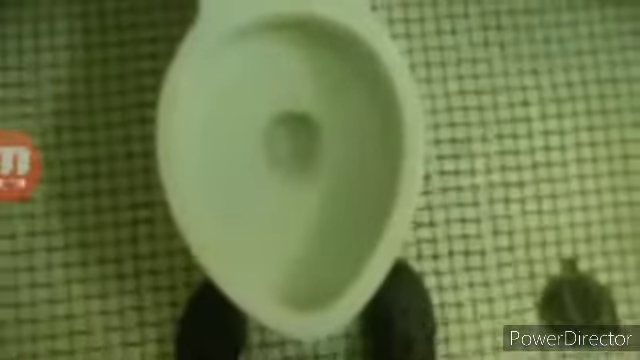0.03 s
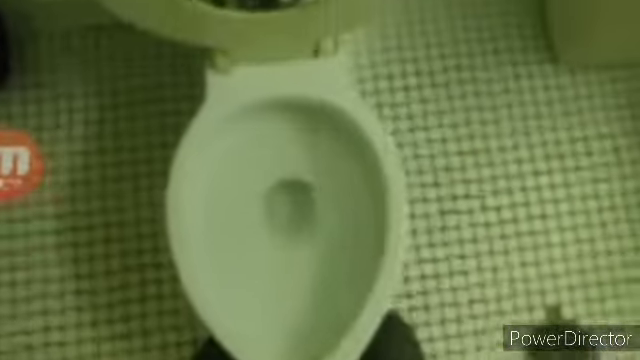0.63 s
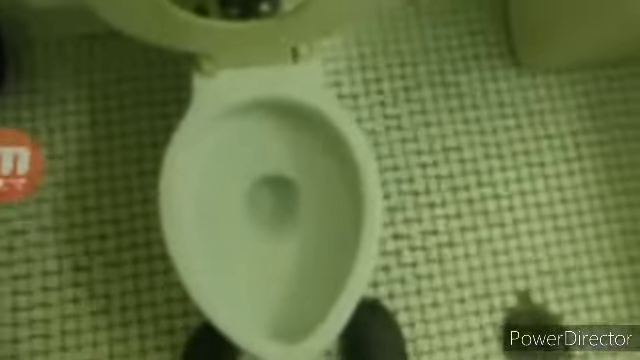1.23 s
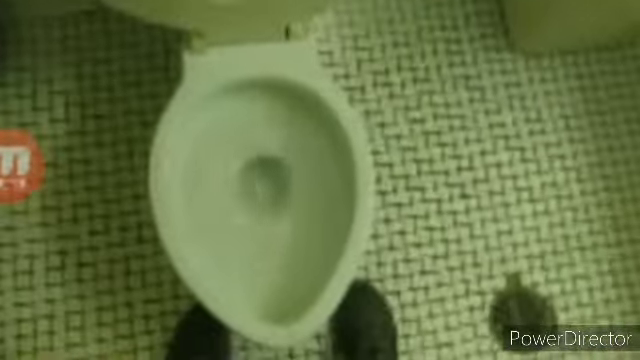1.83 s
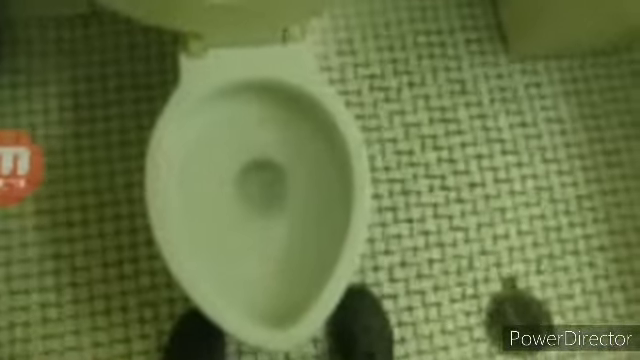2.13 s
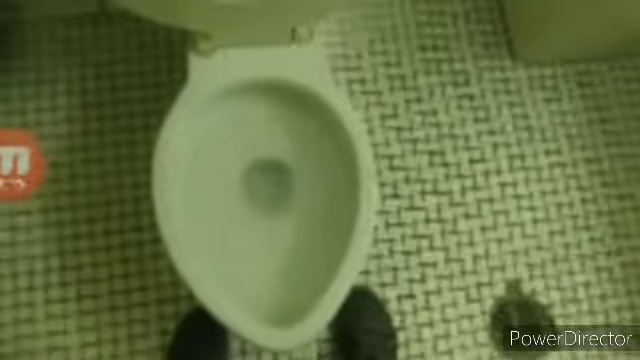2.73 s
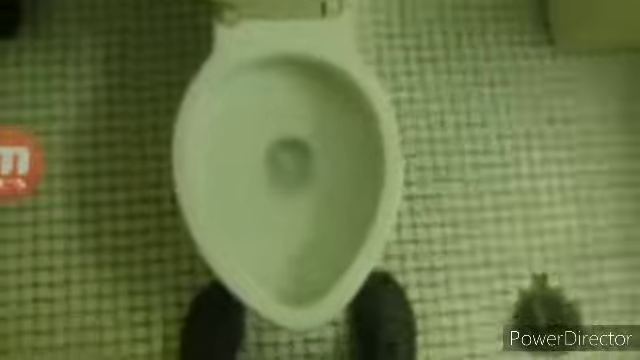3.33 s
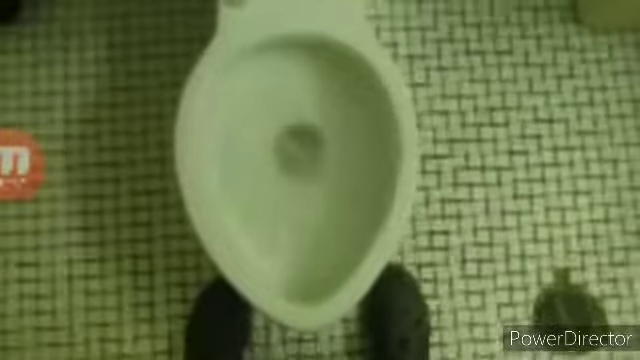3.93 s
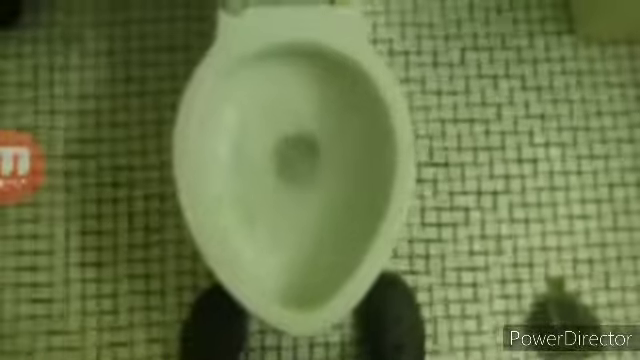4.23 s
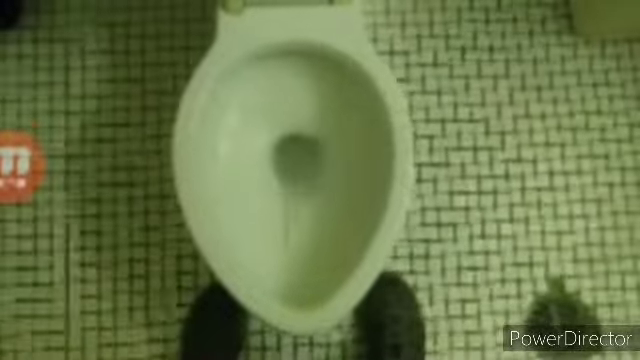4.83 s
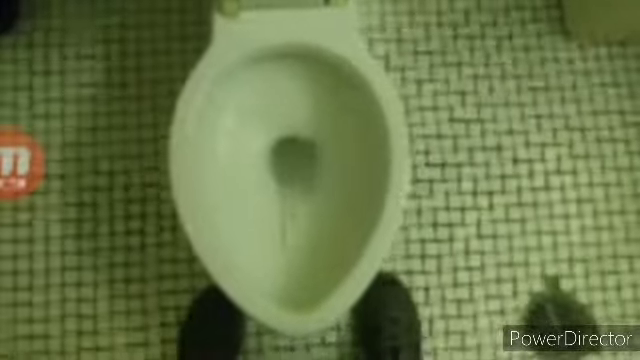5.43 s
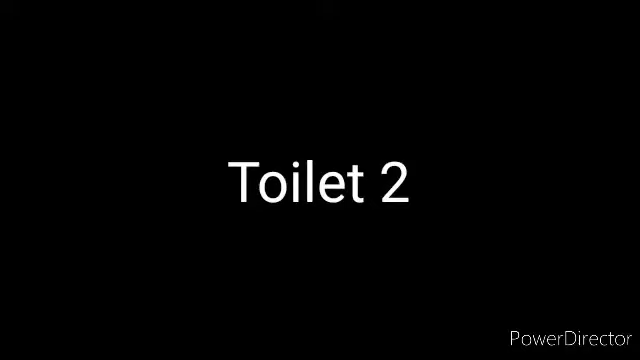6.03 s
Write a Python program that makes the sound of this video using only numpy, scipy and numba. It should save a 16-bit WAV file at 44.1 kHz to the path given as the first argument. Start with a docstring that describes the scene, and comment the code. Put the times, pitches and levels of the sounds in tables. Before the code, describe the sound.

A pressure-valve toilet flushes in a small tiled restroom, heard from just above the bowl with a short, bright echo. A sharp metal clack comes at 0.1 seconds and another at 0.65, with lighter knocks over a quiet pipe hiss and a faint low fan hum. Water starts near 0.9 seconds, and trapped air belches through the trap around 1.2 to 1.4. From 1.6 seconds a loud, steady, fizzing rush churns the bowl, with soft drumming in the drain. From about 3 seconds the flow sputters in bright spurts, smacks and pinging drops as the bowl empties. Near 5 seconds water slaps back onto the porcelain, sounding hollower, with glugs, spray and small puffs of air buffeting the microphone. The sound stops abruptly at 5.9 seconds.

```python
"""A pressure-valve toilet flushes in a small tiled restroom, heard from just above the bowl.
The supply pipe hisses over a faint low fan hum, and the valve clacks. The jet opens, trapped air
belches through the trap, then the jet tears the water into fizzing bubbles while slugs drum in the drain.
From about 3 s it sputters as the bowl empties. Near 5 s water slaps back in, with glugs and puffs of air.
The sound stops abruptly at 5.9 s; a limiter holds the loudest peaks throughout."""
import sys
import numpy as np
from scipy import signal
from scipy.fft import rfft, irfft
from scipy.io import wavfile
from scipy.ndimage import uniform_filter1d, minimum_filter1d
from numba import njit

SR = 44100
rng = np.random.default_rng(int(sys.argv[2]) if len(sys.argv) > 2 else 0)


def store_wav(level_fs):
    """Save 16-bit WAV to argv[1]."""
    pcm = np.round(np.clip(np.atleast_2d(level_fs), -1, 1) * 32767)
    wavfile.write(sys.argv[1], SR, pcm.T.astype(np.int16))


N = 269010
TIME = np.arange(N) / SR
FREQ = np.maximum(np.fft.rfftfreq(2048, 1 / SR), 1)


def undb(db):
    """Decibels to gain."""
    return 10 ** (np.asarray(db) / 20)


def curve(table, column=1):
    """One table column at every sample."""
    rows = np.array(table)
    return np.interp(TIME, rows[:, 0], rows[:, column])


def during(table, fade_s=0.023):
    """Gate, open over a table's time span."""
    return np.clip(np.minimum(TIME - table[0][0], table[-1][0] - TIME) / fade_s + 1, 0, 1)


def shape(x, db):
    """Minimum-phase filter, one gain per FREQ bin."""
    cepstrum = irfft(np.log(undb(db)))
    half = len(cepstrum) // 2
    cepstrum[1:half] *= 2
    cepstrum[half + 1:] = 0
    return signal.fftconvolve(x, irfft(np.exp(rfft(cepstrum))))[:len(x)]


def colour(x, points, tilt_db_oct=0):
    """Filter by (frequency [Hz], gain [dB]) points plus a tilt."""
    hz, db = np.transpose(points)
    tilt_db = tilt_db_oct * np.log2(np.maximum(FREQ / hz[0], 1))
    return shape(x, np.interp(np.log(FREQ), np.log(hz), db) + tilt_db)


def steady(x, samples=4000):
    """Hold the running rms at 1, keeping the fast grain."""
    return x / np.sqrt(np.abs(uniform_filter1d(x * x, samples)) + 1e-12)


def noise(length, points, tilt_db_oct=0, samples=4000):
    """Coloured noise at unit rms."""
    return steady(colour(rng.standard_normal(length), points, tilt_db_oct), samples)


def add(out, time_s, sound):
    """Mix a sound in at time_s."""
    start = max(int(time_s * SR), 0)
    out[start:start + len(sound)] += sound[:len(out) - start]


def swell(start_s, hold_s, attack_s, release_s):
    """Envelope of a push of water or air: rise, hold, decay."""
    age_s = TIME - start_s
    return np.clip(age_s / attack_s, 0, 1) * np.exp(-np.maximum(age_s - hold_s, 0) / release_s)


@njit
def ring(length, start, hz, cycles, gain, glide):
    """Bubbles as sines: quick swell, 60 dB decay over their cycles, pitch up by the fraction glide."""
    out = np.zeros(length)
    for k in range(len(start)):
        life = cycles[k] * SR / hz[k]
        turn_rad = 2 * np.pi * min(hz[k], 0.4 * SR) / SR
        phasor = gain[k] + 0j
        step = np.exp(1j * turn_rad - 6.9 / life)
        bend = np.exp(1j * turn_rad * glide / life)
        closed, opening = 1., np.exp(-40 / life)
        for i in range(int(start[k]), min(int(start[k] + life), length)):
            out[i] += phasor.imag * (1 - closed)
            phasor *= step
            step *= bend
            closed *= opening
    return out


def bubbles(hz, spread_oct, cycles, skew, count):
    """Random bubble cloud around a pitch; skew makes a few much stronger."""
    when, strength = rng.random((count, 2)).T
    detune, life = rng.standard_normal((count, 2)).T
    start = np.floor(when * N)
    pitch_hz = (hz * np.ones(N))[start.astype(int)] * 2 ** (spread_oct * detune)
    gain = (0.01 + strength) ** -skew
    return ring(N, start, pitch_hz, cycles * np.exp(life / 2), gain, glide=0.029)


def trap_mouth(x, cutoff_hz=580):
    """The narrow trap radiates almost nothing below its lowest resonance."""
    return signal.sosfilt(signal.butter(7, cutoff_hz, "high", fs=SR, output="sos"), x)


# Bowl resonances and notches: (frequency [Hz], width [Hz], relative gain [dB])
BOWL_BANDS = [(780, 90, 1), (900, 330, 1.5), (1291, 140, 4), (1418, 54, 5.5), (1901, 200, 4),
              (2540, 150, 1.5), (2756, 140, 6), (3013, 170, -1.5), (3247, 100, 4), (3755, 112, -11.5),
              (3824, 93, 6.5), (4238, 163, -10.5), (4570, 310, -2.5), (4773, 98, -13), (5470, 90, 4),
              (5493, 67, -12), (5720, 270, 4), (6476, 77, 5.5), (6680, 390, -1.5)]


def restroom(x, t60_s=0.18, tail_db=-6):
    """The bowl colours the sound; close tiled walls add a short bright tail."""
    bowl_db = sum(db * np.exp(-2 * ((FREQ - hz) / width_hz) ** 2) for hz, width_hz, db in BOWL_BANDS)
    direct = shape(x, bowl_db - 3)
    t = TIME[:SR // 2]
    tail = rng.standard_normal(len(t)) * np.exp(-np.log(1000) * t / t60_s) * (t > 0.003)
    tail = colour(tail / np.linalg.norm(tail), [(200, -0.5), (1200, 0), (6000, -3), (13000, -10)])
    return direct + undb(tail_db) * signal.fftconvolve(direct, tail)[:N]


# Pipe hiss with fan peaks at 95 and 210 Hz: (frequency [Hz], gain [dB])
PIPE_AND_FAN_SPECTRUM = [(30, -49), (60, -22.5), (95, -7), (150, -21), (210, -8), (300, -15.5), (550, -14),
                         (800, -5), (1300, 0.5), (2000, -3), (3300, -8), (5900, 9.5), (10000, -5.5),
                         (15000, -11)]
# Hiss and hum envelope: (time [s], level [dB])
PIPE_AND_FAN_LEVEL = [(0, -38.5), (.03, -46), (.08, -43.5), (.24, -53.5), (.34, -48), (.45, -48.5),
                      (.55, -50), (.64, -47.5), (.7, -42.5), (.84, -40.5), (1.2, -42.5)]


def pipe_and_fan():
    """Supply-pipe hiss over a faint low fan hum."""
    return noise(N, PIPE_AND_FAN_SPECTRUM) * undb(curve(PIPE_AND_FAN_LEVEL))


# Drain spectrum before tilt: (frequency [Hz], gain [dB])
DRAIN_SPECTRUM = [(25, -26.5), (55, -20.5), (100, -5), (200, -4.5), (400, -2), (700, 7), (1500, -24.5),
                  (6000, -64.5)]
# Drain envelope: (time [s], relative level [dB])
DRAIN_LEVEL = [(1.0, -72), (1.59, -76.5), (1.635, -58.5), (2.4, -62), (3.2, -72), (3.95, -73),
               (4.25, -63.5), (4.75, -68.5), (5.25, -51.5), (5.88, -66)]


def drain():
    """Heavy slugs of water drum in the drain."""
    slugs = bubbles(hz=230, spread_oct=0.87, cycles=2.2, skew=0.43, count=2500)
    drumming = steady(colour(slugs, DRAIN_SPECTRUM, tilt_db_oct=3.5), samples=12000)
    return drumming * undb(curve(DRAIN_LEVEL) + 4.5) * during(DRAIN_LEVEL)


# Air puffs: (time [s], level [dB], swing time [s])
AIR_PUFFS = [(4.867, -27.5, 0.00038), (4.999, -25, 0.0004), (5.279, -30, 0.00046), (5.431, -24, 0.0003),
             (5.5592, -27.5, 0.00066), (5.607, -24.5, 0.00049), (5.768, -25, 0.00032),
             (5.8384, -22, 0.00073)]


def puffs():
    """Air from the splashes buffets the microphone: tick, quick suck and push, slow rebound."""
    out = np.zeros(N)
    t = TIME[:SR // 20] - 0.01
    for time_s, db, swing_s in AIR_PUFFS:
        slow, fast = t / swing_s, 3 * t / swing_s + 3
        push = 0.96 * slow * np.exp(-slow ** 2 / 2)
        tick = 1.84 * fast * np.exp(-fast ** 2 / 2)
        rebound = -np.sin(2 * np.pi * 125 * t) * np.exp(-np.abs(t) / 0.011) * (t > 0)
        add(out, time_s + t[0], undb(db) * (push + tick + 0.12 * rebound))
    return out


# Air pushed out, later drawn back as the siphon breaks:
# (time [s], hold [s], pocket level [dB], pocket pitch [Hz], big-bubble level [dB])
TRAP_GLUGS = [(1.18, .01, -13.5, 1447, -31), (1.231, 0.11, -16.5, 1282, -27), (1.354, .05, -33, 1478, -38),
              (4.985, 0.12, -32, 1830, -48), (5.19, .15, -29.5, 1907, -39.5), (5.49, 0.1, -30, 1893, -60)]


def belch(attack_s=0.012, release_s=0.02):
    """An air pocket throbs in the trap and sheds big bubbles."""
    time_s, hold_s, pocket_db, hz, big_db = np.transpose(TRAP_GLUGS)
    pushes = np.array([swell(start, hold, attack_s, release_s) for start, hold in zip(time_s, hold_s)])
    pitch_hz = np.interp(TIME, time_s + hold_s / 2, hz)
    pocket = steady(bubbles(pitch_hz, spread_oct=0.067, cycles=39, skew=0.53, count=3500), samples=1200)
    big = bubbles(hz=860, spread_oct=0.38, cycles=30, skew=0.35, count=3000)
    big = steady(trap_mouth(big), samples=1500)
    return trap_mouth(pocket * (undb(pocket_db) @ pushes) + big * (undb(big_db) @ pushes))


# Spray and smack spectrum: (frequency [Hz], gain [dB])
SPRAY_SPECTRUM = [(1000, -31), (4000, -14.5), (7500, 0.5), (10000, -9), (13000, -8.5), (15500, -16.5)]


def spray(spatters=400, decay_s=0.0092):
    """Fine mist lands in sudden random spatters; single droplets ping."""
    hiss = noise(N, SPRAY_SPECTRUM)
    when, strength = rng.random((spatters, 2)).T
    hits = np.bincount((when * N).astype(int), -np.log(1 - strength), N)
    patter = signal.lfilter([1], [1, -np.exp(-1 / (decay_s * SR))], hits)
    mist = hiss * steady(1 + undb(-2) * patter, samples=12000)
    drops = bubbles(hz=9000, spread_oct=0.35, cycles=38, skew=0.62, count=2200)
    return undb(7) * mist + undb(5.5) * steady(colour(drops, SPRAY_SPECTRUM), samples=9000)


# Water smacks: (time [s], level [dB])
WATER_SMACKS = [(2.739, -19.5), (3.225, -23), (3.337, -33), (3.631, -21), (3.7833, -25), (3.9389, -16.5),
                (4.059, -18.5), (4.4093, -16), (4.8656, -24), (4.997, -20.5), (5.5575, -17.5),
                (5.7813, -17.5), (5.8346, -21)]


def smacks(decay_s=0.018):
    """Water hits the porcelain in flat, bright bursts."""
    out, t = np.zeros(N), TIME[:SR // 10]
    for time_s, db in WATER_SMACKS:
        burst = noise(len(t), SPRAY_SPECTRUM, tilt_db_oct=-2)
        add(out, time_s, burst * np.exp(-t / decay_s) * undb(db))
    return out


# Single bubbles and drops: (time [s], level [dB], pitch [Hz], life [cycles])
SINGLE_BUBBLES = [(1.157, -12, 8450, 110), (1.188, -11, 1480, 56), (1.265, -10, 5570, 98),
                  (1.274, -18, 8700, 180), (1.323, -2.5, 1363, 37), (1.338, -13, 770, 33),
                  (1.367, -12, 1646, 72), (1.399, -18, 1835, 90), (2.739, -2, 5500, 63),
                  (3.544, -9, 5230, 44), (3.624, -13.5, 3870, 170), (3.918, -2.5, 8300, 68),
                  (4.037, -1, 6320, 70), (4.151, 2, 4450, 260), (4.353, -6.5, 6300, 81),
                  (4.385, -4, 6520, 76), (4.545, -12, 4030, 170), (4.595, -18, 3940, 130),
                  (4.879, -5.5, 5860, 44), (4.882, -17.5, 2590, 92), (5.221, -5, 910, 11),
                  (5.298, -3.5, 1045, 13), (5.501, 0, 3640, 160)]


def bloops():
    """Single bubbles and drops ring with a slight rise in pitch."""
    time_s, db, hz, cycles = np.array(SINGLE_BUBBLES, float).T.copy()
    return trap_mouth(ring(N, time_s * SR, hz, cycles, undb(db), glide=0.034))


# Crack spectrum before tilt: (frequency [Hz], gain [dB])
CRACK_SPECTRUM = [(100, -64.5), (500, -44.5), (1000, -13), (1900, -1.5), (3000, -8), (4200, 7), (5800, 6.5),
                  (7500, 3), (10000, -10.5), (15000, -33)]
# Valve body modes: (frequency [Hz], level [dB], t60 before damping [s])
BODY_MODES = [(1390, -28, 0.76), (2050, -26, 0.39), (3760, -20.5, 0.39), (4460, -15, .1), (5660, -16.5, .3),
              (5860, -13.5, 1)]
# Handle and valve knocks: (time [s], level [dB], crack t60 [s], tilt [dB/oct], relative ring [dB])
VALVE_KNOCKS = [(0.082, 0.5, 0.015, 1.5, 0), (0.095, -26, 0.11, -4, -19), (.104, -17.5, 0.12, -1.5, -29),
                (0.118, -23, 0.13, -1.5, -24), (0.139, -36.5, 0.2, -9.5, -13),
                (.43, -45.5, 0.12, -9.5, -20), (0.473, -46.5, 0.087, -9, -15), (0.645, -33, .08, -5, -8),
                (0.653, -8, 0.036, 3, 3), (0.662, -25, 0.15, -3, 5.5), (0.753, -26.5, 0.2, -5.5, -0.5),
                (.923, -25, 0.16, 22, -2), (1.015, -23, 0.13, 5, -10.5), (1.023, -21, 0.11, -6.5, -6),
                (1.593, -12, 0.039, -9.5, -14)]


def valve(mode_width_hz=90):
    """Metal knocks crack and ring the valve body; water roughens each mode into a narrow band."""
    out, t = np.zeros(N), TIME[:SR // 2]
    for time_s, db, t60_s, tilt_db_oct, ring_db in VALVE_KNOCKS:
        crack = noise(len(t), CRACK_SPECTRUM, tilt_db_oct, samples=400)
        crack *= np.exp(-np.log(1000) * t / t60_s)
        metal = 0
        for hz, mode_db, mode_t60_s in BODY_MODES:
            resonator = signal.iirpeak(hz, hz / mode_width_hz, fs=SR)
            band = steady(signal.lfilter(*resonator, rng.standard_normal(len(t))), samples=900)
            metal += band * undb(mode_db) * np.exp(-np.log(1000) * t / mode_t60_s)
        damping = np.exp(-t / (2 * t60_s))  # short knock, short ring
        add(out, time_s, (crack + undb(ring_db - 10.5) * damping * metal) * undb(db))
    return out


# Foam spectrum: (frequency [Hz], gain [dB])
FOAM_SPECTRUM = [(300, -35), (900, -16), (1600, -5.5), (2700, -5), (4000, 7), (7500, 3), (12000, -24.5)]
# Jet spurts: (time [s], level [dB], bubble pitch [Hz], decay [s])
JET_SPURTS = [(1.178, -10.5, 5300, 0.015), (2.61, -4.5, 5480, 0.022), (2.876, -17, 5550, 0.024),
              (3.218, -13, 6000, 0.017), (3.242, -4, 5040, 0.014), (3.293, -8, 5440, 0.018),
              (3.3317, -2.5, 4900, 0.02), (3.373, -19, 5300, 0.0088), (3.397, -0.5, 5730, 0.022),
              (3.544, -10, 4940, 0.013), (3.581, -12, 5700, 0.017), (3.702, -14.5, 5600, 0.023),
              (3.782, -14, 5780, 0.016), (3.894, -12.5, 5760, 0.018), (4.062, -9, 5340, 0.018),
              (4.098, -17, 5370, 0.016), (4.1113, -0.5, 4700, 0.017), (4.417, -12, 5800, 0.021),
              (4.6837, -16, 5750, 0.018), (4.901, -10, 5820, 0.017), (5.361, -1, 5470, 0.019),
              (5.463, -11, 5350, 0.022), (5.629, -2, 5200, 0.012)]


def spurts(count=24, foam_db=-13.5):
    """Each gulp of air bursts into one strong bubble, a weaker trail and a short wash of foam."""
    out, t = np.zeros(N), TIME[:SR // 4]
    for time_s, db, hz, decay_s in JET_SPURTS:
        lag = 2 * np.linspace(0, 1, count) * rng.uniform(0.7, 1, count)  # in decay times
        detune, strength = rng.standard_normal((count, 2)).T
        gain = np.where(lag > 0, undb(2 * strength - 10 * lag - 6), 1)
        pitch_hz = hz * 2 ** (0.14 * detune * (lag > 0))
        cluster = ring(len(t), lag * decay_s * SR, pitch_hz, np.full(count, 40.), gain, glide=0.03)
        cluster /= np.sqrt(uniform_filter1d(cluster ** 2, size=130).max())
        foam = noise(len(t), FOAM_SPECTRUM) * np.exp(-t / decay_s)
        add(out, time_s, (cluster + undb(foam_db) * foam) * undb(db))
    return out


# Full-bowl spectrum before tilt: (frequency [Hz], gain [dB])
POOL_SPECTRUM = [(200, -47), (450, -21.5), (600, -15), (760, -7), (1300, 2.5), (1900, 3.5), (2400, -1.5),
                 (3500, -3.5), (6000, 5), (10000, -32), (15000, -41.5)]
# Empty-bowl spectrum before tilt: (frequency [Hz], gain [dB])
REFILL_SPECTRUM = [(200, -25), (500, -29.5), (750, 7), (1100, 4), (1800, 5.5), (2400, 0), (3000, -6),
                   (3450, 7.5), (4300, 0.5), (8000, -17), (15000, -34.5)]


def churn(crossfade_s=(4.6, 5.0)):
    """The pool churns; once it is gone, water falls on bare porcelain and sounds hollower."""
    slosh = bubbles(hz=2030, spread_oct=0.99, cycles=22.2, skew=0.26, count=20000)
    pool = steady(colour(slosh, POOL_SPECTRUM, tilt_db_oct=4.5))
    refill = steady(colour(slosh, REFILL_SPECTRUM, tilt_db_oct=8))
    mix_rad = np.interp(TIME, crossfade_s, [0, np.pi / 2])
    return (np.cos(mix_rad) * pool + np.sin(mix_rad) * refill) * undb(2.5)


# Fizz spectrum: (frequency [Hz], gain [dB])
FIZZ_SPECTRUM = [(300, -43), (1500, -7), (2800, -4), (3600, 4.5), (6000, 1.5), (8000, 2), (10000, -3),
                 (15000, -12.5)]


def fizz(pitch_hz):
    """Tiny bubbles torn by the jet; a few ring much longer."""
    tiny = bubbles(pitch_hz, spread_oct=0.21, cycles=17.1, skew=0.15, count=12000)
    tiny = steady(colour(tiny, FIZZ_SPECTRUM))
    plinks = bubbles(pitch_hz, spread_oct=0.18, cycles=90, skew=0.3, count=1100)
    plinks = steady(colour(plinks, FIZZ_SPECTRUM), samples=9000)
    return (tiny + undb(-5.5) * plinks) * undb(-2.5)


def turbulence(depth_db=2.5, rate_hz=160):
    """Random swings of the jet's level."""
    knots = rng.standard_normal(7 * rate_hz)
    return undb(depth_db * np.interp(TIME * rate_hz, np.arange(len(knots)), knots))


# Steady jet: opens, runs full, starves, refills. Levels relative.
# (time [s], fizz [dB], bubble pitch [Hz], churn [dB], spray [dB])
JET_FLOW = [(.86, -37, 5140, -51, -64), (1.1, -32, 5300, -39, -59), (1.2, -25, 5820, -32.5, -30.5),
            (1.38, -31, 6400, -31, -45), (1.58, -24.5, 6230, -40, -39.5), (1.61, -14.5, 6180, -37, -40),
            (1.85, -14.5, 5436, -30.5, -38), (2.48, -15.5, 5115, -30.5, -39.5), (2.66, -19, 5090, -36, -42),
            (2.95, -14, 4950, -30.5, -39.5), (3.14, -17, 4690, -35, -40.5), (3.19, -25, 5550, -44.5, -41),
            (4.87, -27.5, 5930, -49.5, -40.5), (5.06, -21, 5900, -30.5, -31.5),
            (5.3, -19, 5870, -25.5, -30), (5.39, -22.5, 5790, -32.5, -30), (5.81, -22, 5820, -39, -34.5),
            (5.89, -32.5, 5820, -42.5, -38.5)]
# Surges on top: (time [s], hold [s], fizz [dB], bubble pitch [Hz], churn [dB])
JET_SURGES = [(0.914, 0.038, -27, 5720, -42), (1.01, 0.028, -24.5, 4930, -27.5),
              (1.097, 0.022, -31, 5240, -32.5), (1.168, 0.052, -12, 5900, -51),
              (3.149, 0.02, -18.5, 3900, -39), (3.239, 0.046, -20, 5320, -40),
              (3.312, .036, -19.5, 4920, -36), (3.406, 0.037, -13.5, 5720, -51),
              (3.437, .062, -15, 6280, -38), (3.526, .018, -29, 5360, -36),
              (3.619, 0.023, -18, 5350, -37.5), (3.777, 0.015, -29, 5870, -48),
              (3.93, 0.021, -17.5, 5440, -35), (4.111, 0.078, -14, 4860, -29),
              (4.199, 0.05, -15, 6000, -38.5), (4.259, 0.077, -14.5, 5510, -43),
              (4.434, 0.022, -10, 5900, -52.5), (4.459, .042, -13.5, 5000, -39),
              (4.597, 0.016, -22.5, 5800, -42), (4.678, 0.026, -13, 6340, -49),
              (4.931, .03, -13.5, 5860, -49), (5.002, 0.043, -14, 6080, -47),
              (5.335, 0.029, -10, 4880, -48), (5.478, 0.12, -15, 4410, -27.5),
              (5.617, .05, -15.5, 5200, -31)]


def jet(sag_oct_per_s=0.8, surge_spray_db=-26.5):
    """Steady flow and surges drive fizz, churn and spray; the strongest flow dominates the fizz pitch."""
    fizz_power, churn_power, spray_power = (undb(curve(JET_FLOW, column=k)) ** 2 for k in (1, 3, 4))
    weighted_pitch = fizz_power * curve(JET_FLOW, column=2)
    for time_s, hold_s, fizz_db, hz, churn_db in JET_SURGES:
        push = swell(time_s, hold_s, attack_s=0.003, release_s=0.013)
        surge_power = (push * undb(fizz_db)) ** 2
        fizz_power += surge_power
        churn_power += (push * undb(churn_db)) ** 2
        spray_power += surge_power * undb(surge_spray_db) ** 2
        sag = 2 ** (-sag_oct_per_s * (TIME - time_s))  # bubbles grow during a surge
        weighted_pitch += surge_power * hz * sag
    water = fizz(weighted_pitch / fizz_power) * np.sqrt(fizz_power)
    water += churn() * np.sqrt(churn_power)
    water += spray() * np.sqrt(spray_power)
    return water * turbulence() * during(JET_FLOW, fade_s=0.072)


def scene():
    """All but the puffs passes through bowl and room. Mono."""
    flush = pipe_and_fan() + valve() + belch() + jet() + drain() + spurts() + smacks() + bloops()
    return (restroom(flush) + puffs())[None]


def record(dry, ceiling=0.32, stop_s=5.903, low_hz=70, top_hz=15700):
    """Fast limiter, abrupt stop, deep bass and top cut."""
    gain = np.minimum(1, ceiling / (np.abs(dry) + 1e-9))
    gain = uniform_filter1d(minimum_filter1d(gain, size=90), size=90)
    limited = dry * gain * (TIME < stop_s)
    highpassed = signal.sosfilt(signal.butter(2, low_hz, "high", fs=SR, output="sos"), limited)
    return signal.sosfilt(signal.ellip(10, 0.2, 80, top_hz, fs=SR, output="sos"), highpassed)


dry = scene()
out = record(dry)
store_wav(out)
```